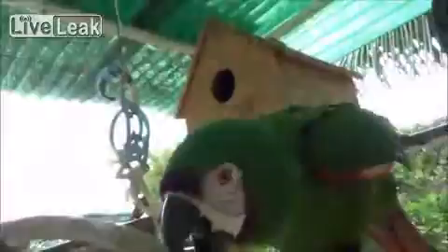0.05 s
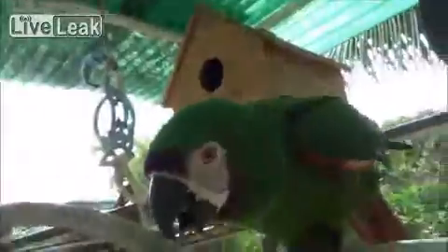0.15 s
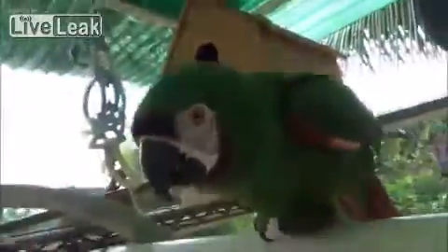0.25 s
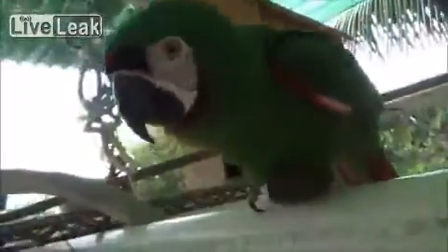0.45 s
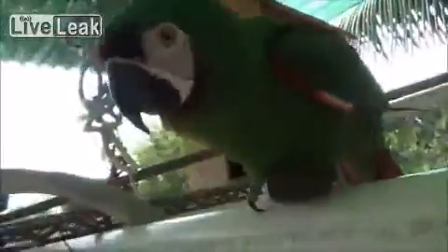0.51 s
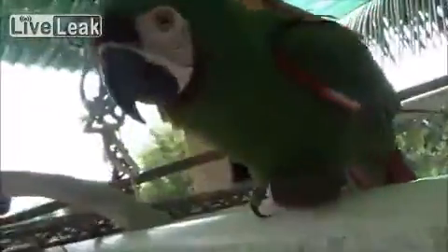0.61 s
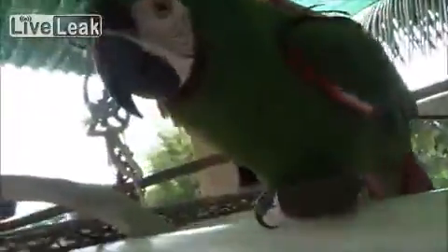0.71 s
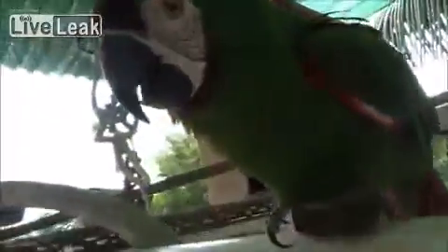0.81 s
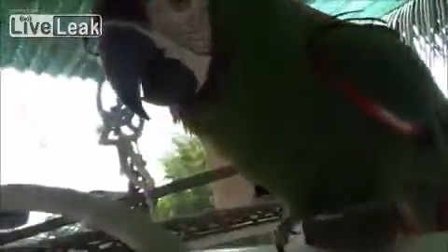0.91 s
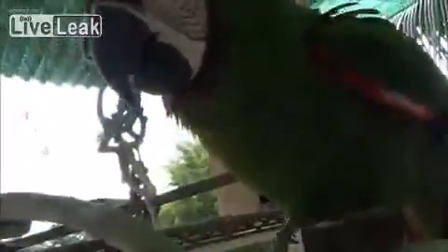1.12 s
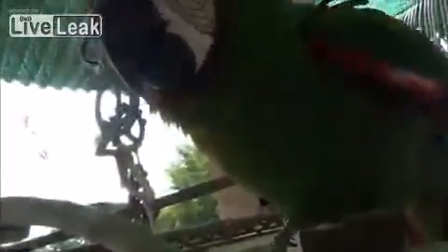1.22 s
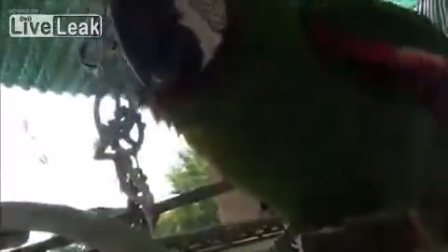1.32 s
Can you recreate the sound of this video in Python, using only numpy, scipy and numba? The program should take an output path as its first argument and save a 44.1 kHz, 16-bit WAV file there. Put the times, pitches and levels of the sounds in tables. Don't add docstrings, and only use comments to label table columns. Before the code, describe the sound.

After a brief moment of soft outdoor air and faint rustling, a close parrot lets out a loud raspy squawk that breaks into dry, croaking creaks under a roof with a very short echo; a few faint ticks follow.

```python
import sys
import numpy as np
from scipy import signal
from scipy.io import wavfile
from scipy.ndimage import uniform_filter1d
from numba import njit

SR = 44100
rng = np.random.default_rng(int(sys.argv[2]) if len(sys.argv) > 2 else 0)


def decibels_to_gain(level_db):
    exponent = np.asarray(level_db, float) / 20
    return 10 ** exponent


def log_audio(samples):
    frames = np.atleast_2d(samples).T
    limited = np.clip(frames, -1, 1)
    pcm = np.round(limited * 32767).astype(np.int16)
    wavfile.write(sys.argv[1], SR, pcm)


N = 59535
LEFT_RIGHT = np.array([[1], [-1]])

# pitch in Hz, level in dB per Hz.
AIR = [(15, -66), (25, -23), (119, -7.5), (204, -6.5), (826, -14.5), (1050, -18), (2360, -18), (9550, -26),
       (15500, -24)]
# middle in seconds, length in seconds, pitch in Hz, width in Hz,
# level in dB.
RUSTLES = [(0.089, 0.041, 1400, 1700, -43.5), (0.166, 0.031, 250, 210, -55),
           (0.074, 0.044, 8100, 3300, -53.5), (1.04, 0.09, 1455, 130, -49), (0.48, 0.027, 2300, 200, -52),
           (0.7, 0.0088, 760, 300, -63), (0.477, 0.027, 100, 120, -43), (0.56, 0.0085, 300, 460, -27.5),
           (.69, 0.021, 68, 43, -45.5), (0.227, 0.036, 150, 105, -40.5), (1.22, 0.011, 2300, 200, -54),
           (1.315, .02, 2200, 130, -56)]
# time in seconds, level in dB, level of the bright closing edge in dB.
ONSET = [(.208, -50, -20), (.222, -22, -12), (.235, -19, -10), (.245, -22, -3), (.26, -24, 4), (.3, -23, 5),
         (.335, -20, 3)]
FIRST = [(0.347, -16.5, -1.5), (0.358, -13, 0.5), (0.377, -12.5, -1), (0.394, -14.5, -0.5),
         (0.417, -15.5, -5), (0.42, -31, -3), (.434, -31.5, -32), (.448, -28.5, -13)]
SECOND = [(.46, -24.5, -11), (0.464, -15, -9.5), (0.481, -14.5, -2), (.495, -19.5, -14.5), (.52, -16, -0.5),
          (.55, -15, -3), (0.58, -12.5, -4.5), (.624, -17, -1), (0.686, -17.5, -3.5)]
FLUTTER = [(.69, -22, -3), (.748, -22, -8), (.753, -40, -10), (.764, -21, -10), (.771, -45, -10),
           (.822, -45, -10), (.83, -24, -6), (.853, -21, -6), (.858, -55, -10)]
LAST = [(.932, -55, -16), (.936, -19, -16), (.945, -18, -16), (.949, -60, -16)]
# time in seconds, pitch in Hz.
PITCH_ONSET = [(.21, 440.7), (.24, 499.5), (.26, 462.3), (.33, 477.1)]
PITCH_FIRST = [(.345, 515), (.357, 505), (.374, 470), (.386, 448), (.398, 412), (.412, 398), (.423, 350),
               (.436, 346)]
PITCH_SECOND = [(.448, 375), (.464, 440), (.482, 422), (.494, 418), (.512, 399), (.53, 401), (.548, 390),
                (.568, 428), (.59, 407), (.602, 397), (.626, 353), (.65, 359), (.664, 362), (.682, 384)]
PITCH_FLUTTER = [(.695, 450), (.76, 523), (.85, 607), (.94, 649.6)]
# time in seconds, roughness from 0 to 1.
ROUGH = [(.2, .5), (.25, .6), (.338, .55), (.352, .12), (.45, .08), (.52, .08), (.676, .07), (.684, .5),
         (.72, .25), (.85, .25), (.93, .1)]
PARTIALS_DB = [0.5, 0.5, -13, -12]
# time in seconds, slope in dB per partial.
PURITY = [(.24, 0), (.255, 4), (.335, 4), (.355, 0), (.68, 0), (.695, -6), (.9, -12)]
# start in seconds, gap in seconds, number of slaps, first level in dB,
# last level in dB.
CREAKS = [(.2126, .0045, 2, -17, -12), (.2396, .0022, 2, -13, -11), (.2462, .0032, 3, -3, -4),
          (.2591, .00645, 7, -5, -4), (.3042, .00648, 8, -4, -7), (.6873, .0045, 7, -8, -8),
          (.7206, .0069, 3, -12, -11), (.7417, .0047, 2, -10, -10), (.7545, .0058, 2, -13, -16),
          (.768, .0076, 3, -6, -9), (.7977, .0088, 3, -4, -6), (.8263, .004, 1, -15, -15),
          (.83, .0062, 4, -8, -9), (.8562, .0083, 3, -4, -3), (.8877, .008, 2, -4, -6),
          (.9236, .01, 1, -6, -6), (.934, .011, 2, -12, -15)]
# time in seconds, beak resonance in Hz, level of the pair above it in dB,
# treble level in dB.
BEAK = [(.21, 1730, -6.5, -38), (.243, 1830, -1.5, -3.5), (.255, 2000, 0, -2), (.32, 2204, -3, 1.5),
        (.4, 2560, -11, -5.5), (.46, 2250, -7.5, -8), (.6, 2326, -4.5, -7.5), (.675, 2225, -7.5, -2),
        (.7, 2176, -3.5, 8), (.8, 2166, -4.5, 6), (.86, 2250, 5.5, 6), (.93, 2250, 8.5, 2.5)]
# time in seconds, posture number from 0 to 2.
POSTURE = [(.41, 0), (.46, 1), (.82, 1), (.85, 2)]
# pitch in Hz, level in dB.
THIRD = [
    [(3050, -7), (3950, -3.5)],
    [(3450, -6), (4300, -10)],
    [(3500, -6.5), (4300, -13.5)],
]
# pitch in Hz, level in dB.
UPPER = [
    [(5600, -24.5), (6750, -12.5), (8100, -11.5), (9650, -11), (12200, -17.5), (13200, -30), (14200, -24)],
    [(5700, -19), (7060, -10), (8200, -18), (9400, -14.5), (11400, -24), (12900, -22), (13900, -22)],
    [(6100, -21), (7100, -15.5), (8700, -19), (9600, -11.5), (11700, -16.5), (13100, -18), (14400, -32)],
]
THIRD_WIDTHS = [700, 560]
UPPER_WIDTHS = [1190, 770, 1300, 1360, 1300, 1300, 1300]
# time in seconds, peak level in dB, pitch in Hz.
TICKS = [
    (2.9, -23.5, 2400),
    (0.78, -30, 6150),
    (0.99, -37, 3000),
    (1.152, -39, 9200),
    (1.31, -46, 4500),
]


@njit
def svf(x, hz, width):
    y, b, l = np.empty(len(x)), 0., 0.
    for i in range(len(x)):
        g, k = np.tan(np.pi * hz[i] / SR), width / hz[i]
        v = (b + g * (x[i] - l)) / (1 + g * (g + k))
        b, l, y[i] = 2 * v - b, l + 2 * g * v, k * v
    return y


def band(x, hz, width):
    return svf(x + 1e-18, np.zeros(N) + hz, float(width))


def ring(x, hz, width):
    return band(band(x, hz, width), hz, width) * SR / (2 * width)


def curve(table, axis=1):
    table = np.array(table, float)
    return np.interp(np.arange(N) / SR, table[:, 0], table[:, axis])


def walk(rate):
    hold = int(SR / rate)
    steps = np.repeat(rng.standard_normal(N // hold + 1), hold)
    return 1.4 * uniform_filter1d(uniform_filter1d(steps, hold), hold)[:N]


def unit(x):
    return x / np.sqrt(np.mean(x ** 2))


def air():
    out, table = 0, np.array(AIR)
    for hz in 30 * 2 ** np.arange(0, 9.1, .5):
        mid, side = (band(band(rng.standard_normal(N), hz, hz / 2), hz, hz / 2) for _ in range(2))
        db = np.interp(np.log(hz), np.log(table[:, 0]), table[:, 1]) + 0.96 * walk(10.0)
        out = out + decibels_to_gain(db) * (mid + np.clip(60 / hz, .13, .6) * side * LEFT_RIGHT)
    return unit(out) * decibels_to_gain(-45.5)


def whine():
    tone = np.sqrt(2) * np.sin(2 * np.pi * 15736 * np.arange(N) / SR)
    return decibels_to_gain(-59.5 + 3.7 * walk(41.2)) * tone


def rustles():
    out, t = 0, np.arange(N) / SR
    for at, length, hz, width, db in RUSTLES:
        grain = unit(band(rng.standard_normal(N), hz, width)) * decibels_to_gain(3.6 * walk(70.36))
        out = out + decibels_to_gain(db) * grain * np.exp(-((t - at) / length) ** 2)
    return out


def bank(x, postures, widths):
    rows, at = np.array(postures, float), curve(POSTURE)
    order, out = np.arange(len(rows)), 0
    for k, width in enumerate(widths):
        hz = np.interp(at, order, rows[:, k, 0])
        db = np.interp(at, order, rows[:, k, 1])
        out = out + (-1) ** k * decibels_to_gain(db) * ring(x, hz, width)
    return out


def tract(x, snap, split_hz, beak_width, upper_db):
    pair = decibels_to_gain(curve(BEAK, axis=2)) * bank(x, THIRD, THIRD_WIDTHS)
    treble = decibels_to_gain(curve(BEAK, axis=3)) * bank(snap, UPPER, UPPER_WIDTHS)
    beak = ring(x, curve(BEAK) + split_hz, beak_width) + ring(x, curve(BEAK) - split_hz, beak_width)
    return -decibels_to_gain(upper_db) * (pair + treble) - beak / 2


def voice():
    table, rough = ONSET + FIRST + SECOND + FLUTTER + LAST, curve(ROUGH)
    hz = curve(PITCH_ONSET + PITCH_FIRST + PITCH_SECOND + PITCH_FLUTTER)
    cycles = np.cumsum(hz * (1 + 0.27 * rough * walk(350))) / SR
    low = 0
    for k, db in enumerate(PARTIALS_DB):
        shake_db = 5.0 * rough * walk(119.2) + 9.3 * rough * walk(450)
        low = low + decibels_to_gain(db + k * curve(PURITY) + shake_db) * np.cos(2 * np.pi * (k + 1) * cycles)
    late = cycles + 0.12
    edge = np.maximum(0, 1 - np.abs(late - np.round(late)) * SR / hz) * decibels_to_gain(1.5 * walk(350))
    breath = unit(rng.standard_normal(N) * (0.64 + np.cos(2 * np.pi * late)))
    breath = decibels_to_gain(-5) * breath * edge.std()
    hiss = decibels_to_gain(3.5) * ring(breath, 9480, 14000)
    drive = edge + breath + hiss
    bright = unit(tract(drive, drive, split_hz=181, beak_width=290, upper_db=-6.5))
    bright = bright * decibels_to_gain(curve(table, axis=2) + 3.3 * rough * walk(192.6))
    pipe_breath = decibels_to_gain(-18) * unit(ring(breath, 860, 810))
    return decibels_to_gain(curve(table)) * (bright - unit(low) + pipe_breath)


def creak():
    scatter_db, jitter_s, air_s = 1.2, .00022, .0013
    x = np.zeros(N)
    for start, gap, count, first_db, last_db in CREAKS:
        count = int(count)
        chance = rng.standard_normal((2, count))
        at = (start + gap * np.arange(count) + jitter_s * chance[0]) * SR
        size = decibels_to_gain(np.linspace(first_db, last_db, count) + scatter_db * chance[1])
        np.add.at(x, at.astype(int), size * (1 - at % 1))
        np.add.at(x, at.astype(int) + 1, size * (at % 1))
    spit = signal.lfilter([1], [1, -np.exp(-1 / (air_s * SR))], x) * rng.standard_normal(N)
    spit = decibels_to_gain(-3) * band(spit, 8200, 12300) / np.sqrt(air_s * SR / 2)
    slap = x + spit
    pipe = decibels_to_gain(-1.5) * ring(x, 715, 480) + decibels_to_gain(-8.0) * ring(x, 478, 486)
    pipe = pipe + decibels_to_gain(-9.0) * ring(slap, 1395, 1060)
    snap = np.roll(slap, int(.0004 * SR)) * decibels_to_gain(1.5 * walk(150))
    push = np.where(np.arange(N) < .853 * SR, 1, -1)
    return decibels_to_gain(-4.5) * tract(slap, snap, split_hz=0, beak_width=400, upper_db=0) + push * pipe


def roof(x):
    t60_s, level_db, dull_hz, spread = 0.08, -17, 2600, 0.1
    t = np.arange(SR // 3) / SR
    tail = rng.standard_normal((2, len(t))) * decibels_to_gain(-60 * t / t60_s) * (t > .003)
    tail = tail[0] + spread * tail[1] * LEFT_RIGHT
    tail = signal.lfilter(*signal.butter(1, dull_hz, fs=SR), tail)
    tail = tail / np.sqrt(np.sum(tail[0] ** 2))
    return decibels_to_gain(level_db) * signal.fftconvolve(x[None], tail, axes=1)[:, :N]


def ticks():
    out = 0
    for at, db, hz in TICKS:
        click = 1. * (np.arange(N) == int(at * SR))
        out = out + decibels_to_gain(db) * ring(click, hz, hz / 3)
    return out


def scene():
    garden = air() + whine() + rustles() + ticks()
    rumble_cut = signal.butter(1, 140, "high", fs=SR, output="sos")
    bird = signal.sosfiltfilt(rumble_cut, voice() + decibels_to_gain(-3) * creak())
    bass = decibels_to_gain(-10.5) * signal.lfilter(*signal.butter(1, 450, fs=SR), bird)
    treble = decibels_to_gain(-14) * np.roll(band(bird, 10500, 7000), int(.0004 * SR))
    near = bird * decibels_to_gain(1.5 * LEFT_RIGHT / 2) + (bass + treble) * LEFT_RIGHT
    return near + roof(bird) + garden * decibels_to_gain(1.1 * LEFT_RIGHT)


def low_pass(x):
    return signal.sosfilt(signal.butter(12, 16150, fs=SR, output="sos"), x)


def record(dry):
    rounded = np.tanh(1.05 * dry) / 1.02
    top_cut = signal.ellip(8, .2, 70, 15950, fs=SR, output="sos")
    return low_pass(signal.sosfilt(top_cut, rounded))


dry = scene()
out = record(dry)
log_audio(out)
```